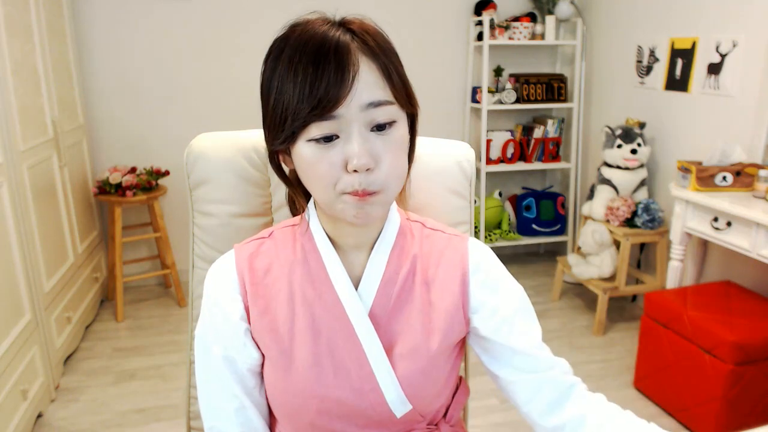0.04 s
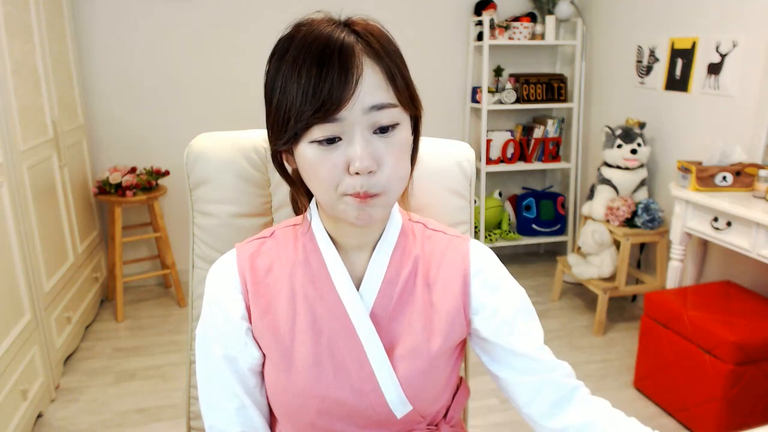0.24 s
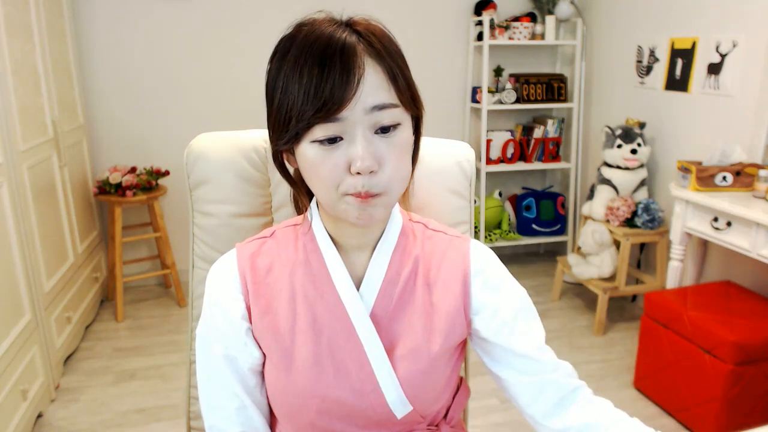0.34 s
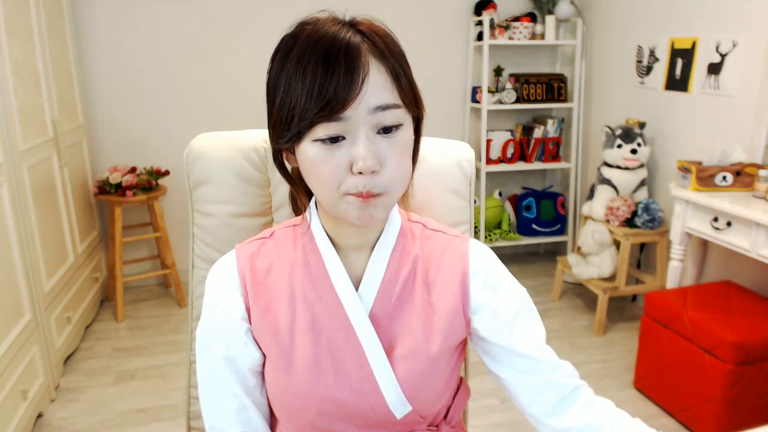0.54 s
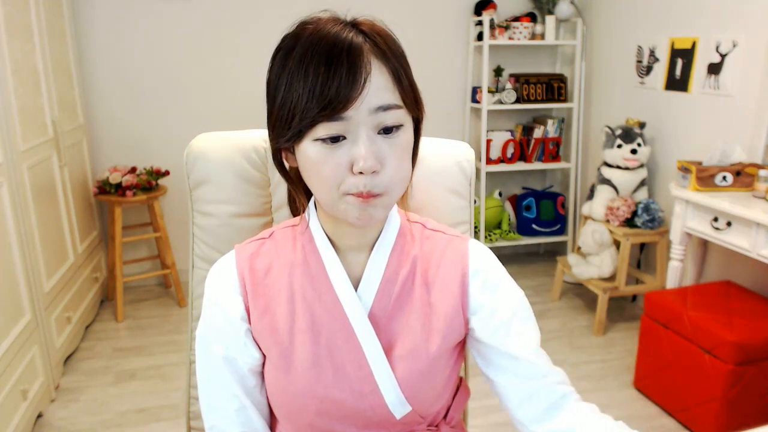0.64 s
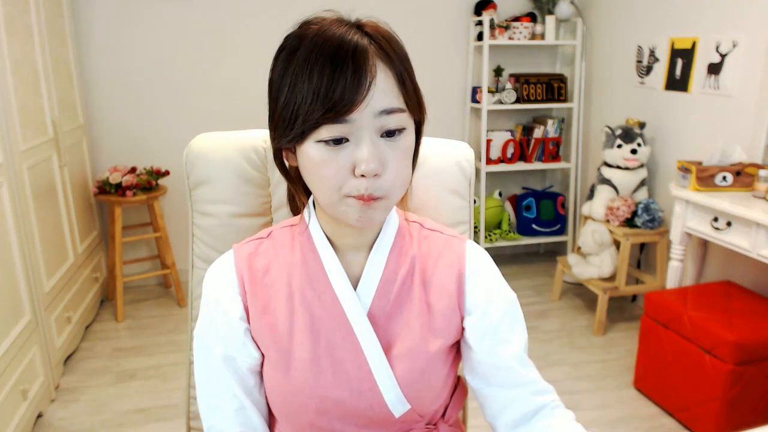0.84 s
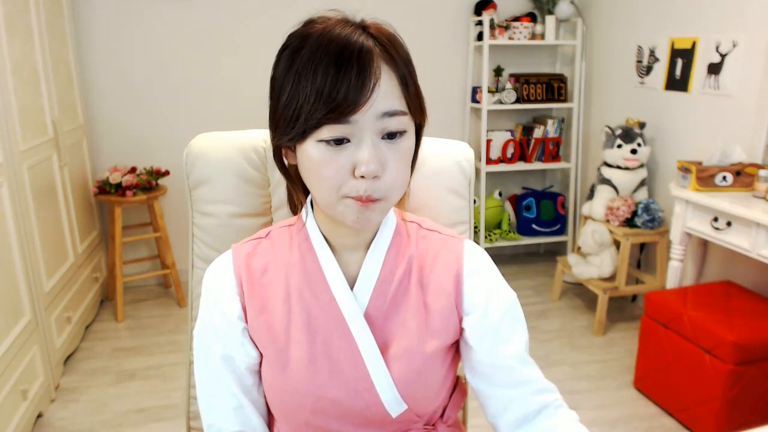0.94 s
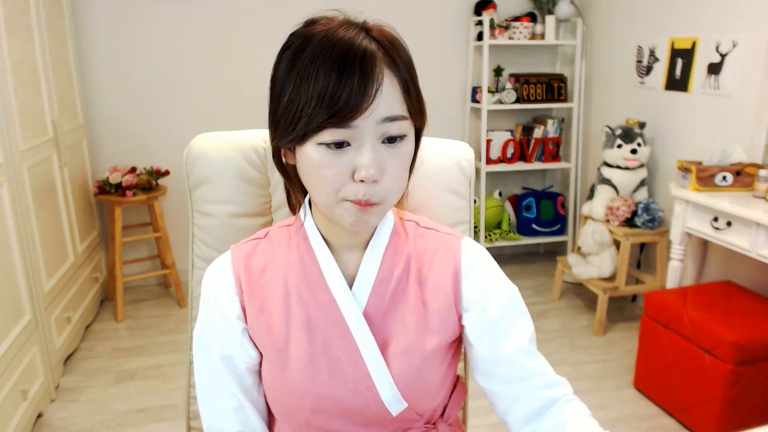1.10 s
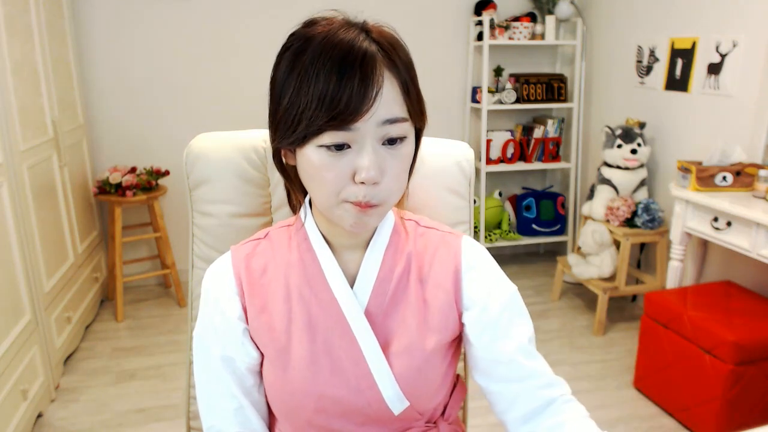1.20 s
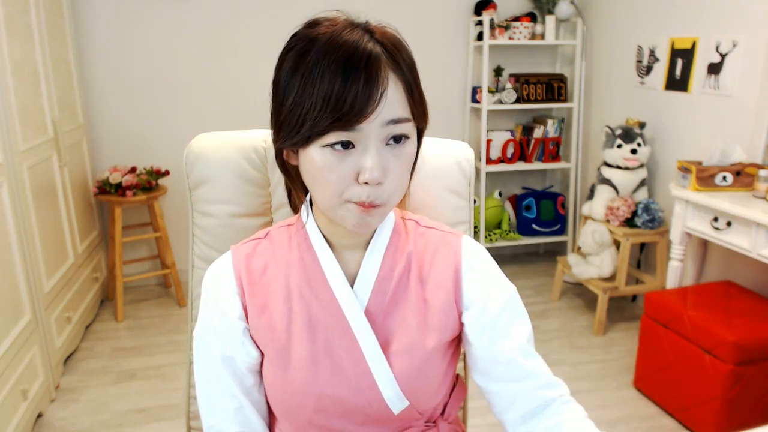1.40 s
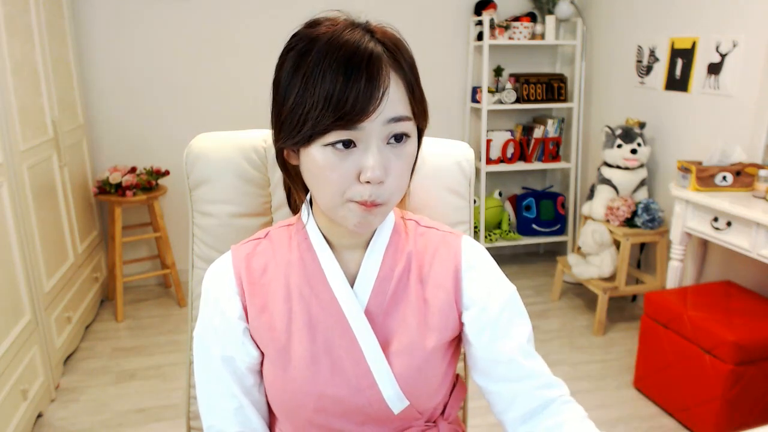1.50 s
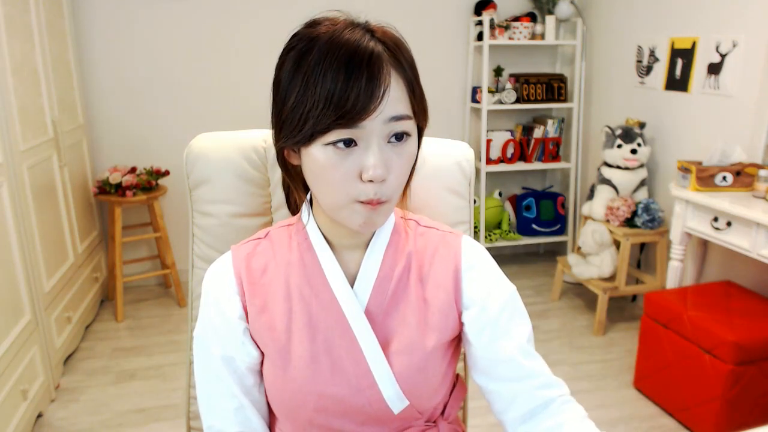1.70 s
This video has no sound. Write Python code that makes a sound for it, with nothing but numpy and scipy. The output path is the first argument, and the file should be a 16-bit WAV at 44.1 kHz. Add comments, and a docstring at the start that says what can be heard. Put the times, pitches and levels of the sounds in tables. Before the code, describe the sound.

A ceramic mug is set on a table in two quick knocks over low room hum.

```python
"""A ventilation hum and a thin hiss are heard first and go on throughout: coloured noise and wavering lines.
Close to the microphone a ceramic mug is then set down on a table in two goes, each a light touch and a
heavier blow: force pulses convolved with a knock, its echoes, modes, dense ringing and a small room.
The mug settles with a soft bump, noise shaped by resonances; two faint brushes of swelling noise follow."""
import sys
import numpy as np
from scipy import signal
from scipy.fft import rfft, irfft
from scipy.io import wavfile

SR = 44100
rng = np.random.default_rng(int(sys.argv[2]) if len(sys.argv) > 2 else 0)


def materialize(psi):
    """Save the field psi as 16-bit PCM at rate SR to the path in sys.argv[1].

    A 1-D psi becomes a single channel; in a 2-D psi each row is a channel.
    """
    bounded = np.clip(np.atleast_2d(psi).T, -1, 1)
    quanta = np.round(bounded * 32767).astype(np.int16)
    wavfile.write(sys.argv[1], SR, quanta)


N = 77175
T = np.arange(N) / SR  # seconds

# Relative colour of the air noise. Each row: frequency in Hz, density in dB per Hz.
AIR_COLOUR = [(20, -2.5), (32, 0), (60, -5), (85, -8), (130, -6), (200, -8), (260, -15), (370, -12.5),
              (500, -20), (750, -21.5), (1200, -27.5), (1850, -26.5), (2400, -33), (3600, -37.5),
              (8000, -40.5), (15500, -41)]
AIR_DB = -47  # rms
# Hum lines. Each row: frequency in Hz, rms level in dB of the steady part.
HUM_LINES = [(49, -45), (100, -61), (145, -50.5), (176.5, -52.5), (351, -65), (564, -74)]
HUM_WAVER, HUM_WAVER_HZ = 0.39, 5.1  # rms share of each line, half width of its spectrum at 1/e

# Contacts of the mug's base. Each row: start in seconds, level in dB, treble corner of the contact
# in Hz, spot on the table (0 or 1).
CONTACTS = [(0.217, -12, 2360, 0), (.2187, 1, 910, 0), (0.451, -15.5, 1480, 1), (0.4557, -6.5, 1370, 1)]
# Relative colour of the dead knock. Each row: frequency in Hz, level in dB.
KNOCK_COLOUR = [(30, -15.5), (120, -9.5), (330, -0.5), (700, -15), (1100, -17.5), (2500, -19.5),
                (4000, -28.5), (9000, -30.5), (16000, -51)]
KNOCK_DB = (15, 9)  # at each spot
# Reflections from nearby surfaces. Each row: delay in seconds, level in dB relative to the knock.
ECHOES = [(.008, -12.5), (.011, -14), (0.0139, -9), (.0286, -13.5), (0.039, -16.5), (0.069, -22)]
# Modes of the table with the mug on it, before the seated mug damps them. Each row: frequency in Hz,
# t60 in seconds, level in dB at the first spot, level in dB at the second spot.
TABLE_MODES = [(48, .3, -37, -15), (61.4, 0.31, -19, -12), (143, .2, -19, -43), (158.1, 0.35, -30, -15.5),
               (273.2, 0.28, -21, -29), (351.7, 0.41, -21, -15), (408.6, 0.15, -19, -18),
               (470.6, 0.29, -30, -28), (586, 0.25, -54, -19.5), (620, .23, -18.5, -39),
               (708, 0.21, -18.5, -46), (884, .17, -31, -24), (1019.4, .2, -26.5, -46),
               (1290, .2, -39, -44)]
# The mug's own short rings, before the same damping. Each row: frequency in Hz, t60 in seconds,
# level in dB at the first spot, level in dB at the second spot.
MUG_MODES = [(1490, 0.23, -45, -31), (2220, .15, -43, -22), (2340, 0.26, -47, -33.5),
             (2520, 0.173, -46, -39), (3970, .12, -54, -43), (4700, .1, -48, -30)]
# Relative colour of the dense ringing. Each row: frequency in Hz, dB at the first spot, dB at the second.
RING_COLOUR = [(30, -13, 4), (120, -7, -13), (352, -3, -1), (690, -3, -1.5), (800, -9.5, -23),
               (1100, -7.5, -12), (2350, -15, -11.5), (2610, -13, -29), (3600, -24, -18.5),
               (4970, -19, -19), (9000, -21.5, -36), (16000, -28, -42)]
RING_DB, RING_T60_S, RING_RISE_S = 14, 0.073, 0.00099
# Relative colour of the room's answer. Each row: frequency in Hz, level in dB.
ROOM_COLOUR = [(30, 1), (150, 4.5), (400, -1), (700, 0), (1200, -5.5), (2450, -7), (3000, -14), (6000, -17),
               (16000, -24)]
# Decay of the room. Each row: frequency in Hz, t60 in seconds.
ROOM_DECAY = [(60, .4), (400, .32), (1100, 0.31), (2900, 0.25), (8000, 0.25)]
ROOM_DB, ROOM_RISE_S = (10.5, 10.5), 0.016  # level at each spot

# Resonances stirred as the base settles. Each row: centre in Hz, full width at half amplitude in Hz,
# rms level in dB relative to the others.
SETTLE_RESONANCES = [(150, 67, -5), (250, 39, -1), (430, 90, -10.5), (588, 43, -7), (680, 39, -7.5),
                     (925, 200, -18), (1740, 260, -23)]
SETTLE_S, SETTLE_RISE_S, SETTLE_T60_S, SETTLE_DB = 0.583, 0.011, 0.24, -31
SEATED_T60_S = 0.28  # extra damping of the table once the mug sits flat

# Faint brushes. Each row: time of the peak in seconds, half length at 1/e in seconds, peak rms level in dB.
BRUSHES = [(0.995, 0.046, -61), (1.181, 0.025, -55)]
# Relative colour of the brushes. Each row: frequency in Hz, level in dB.
BRUSH_COLOUR = [(100, -6), (370, -1), (700, -22), (2000, -15), (5000, -21), (9000, -26.5), (16000, -39)]

LOW_CUT_HZ, TOP_HZ = 21.3, 15800
CEILING = 1.0  # full scale


def undb(db):
    """Convert decibels to an amplitude ratio, by the definition of level."""
    return 10 ** (np.asarray(db) / 20)


def curve(points, hz):
    """Interpolate a table linearly on a logarithmic frequency axis."""
    table_hz, values = np.array(points, float).T
    return np.interp(np.log(np.maximum(hz, 1)), np.log(table_hz), values)


def colour(x, points):
    """Spectral shaping: weight a spectrum by a dB curve, keeping the power of white noise."""
    gain = undb(curve(points, np.fft.rfftfreq(N, 1 / SR)))
    return irfft(rfft(x) * gain / np.sqrt(np.mean(gain ** 2)), N)


def ventilation():
    """Broadband flow noise superposed on tones whose random modulation wavers in level and phase."""
    out = undb(AIR_DB) * colour(rng.standard_normal(N), AIR_COLOUR)
    waver_band = np.exp(-(np.fft.fftfreq(N, 1 / SR) / HUM_WAVER_HZ) ** 2)
    for hz, db in HUM_LINES:
        waver = np.fft.ifft(waver_band * np.exp(2j * np.pi * rng.random(N)))
        carrier = np.exp(2j * np.pi * (hz * T + rng.random()))
        line = (1 + HUM_WAVER * waver / waver.std()) * carrier
        out = out + np.sqrt(2) * undb(db) * line.real
    return out


def click(points):
    """Minimum phase: the most compact causal pulse of a given colour, here of unit energy."""
    cepstrum = irfft(np.log(undb(curve(points, np.fft.rfftfreq(N, 1 / SR)))), N)
    # folding the cepstrum onto positive times makes the pulse causal
    cepstrum[1:N // 2] *= 2
    cepstrum[N // 2:] = 0
    pulse = irfft(np.exp(rfft(cepstrum)), N)
    return pulse / np.linalg.norm(pulse)


def convolve(a, b):
    """Linear superposition: pass one sound through a response."""
    return signal.fftconvolve(a, b)[:N]


def fade(t60):
    """Exponential decay: the level falls by 60 dB in t60 seconds."""
    return np.exp(-np.log(1000) * T / t60)


def diffuse(decays, rise, count=12):
    """Diffuse field: a dense random tail, even in colour, each band with its own decay."""
    hz = np.fft.rfftfreq(N, 1 / SR)
    edges = np.r_[0, np.geomspace(120, 12000, count), SR]
    noise = rfft(rng.standard_normal(N))
    onset = 1 - np.exp(-T / rise)
    out = 0
    for low, high in zip(edges[:-1], edges[1:]):
        inside = (hz >= low) & (hz < high)
        band = irfft(noise * inside, N) * fade(decays((low + high) / 2)) * onset
        # energy in proportion to bandwidth
        out = out + band * np.sqrt(inside.mean()) / np.linalg.norm(band)
    return out


def push(at, db, corner_hz):
    """Contact force: a smooth pulse, longer and duller when the contact is soft."""
    age = np.maximum(T - at, 0) * 2 * np.pi * corner_hz
    force = age * np.exp(-age)
    return undb(db) * force / force.sum()


def table(spot):
    """Impulse response at one spot: knock, reflections, modes, dense ringing and room superposed."""
    knock = undb(KNOCK_DB[spot]) * click(KNOCK_COLOUR)
    echoes = sum(undb(db) * np.interp(T - delay, T, knock, left=0) for delay, db in ECHOES)
    modes = 0
    for hz, t60, *db in [*TABLE_MODES, *MUG_MODES]:
        modes = modes + undb(db[spot]) * fade(t60) * np.sin(2 * np.pi * hz * T)
    ring_colour = [(hz, db[spot]) for hz, *db in RING_COLOUR]
    ring = convolve(diffuse(lambda hz: RING_T60_S, RING_RISE_S), click(ring_colour))
    room = convolve(diffuse(lambda hz: curve(ROOM_DECAY, hz), ROOM_RISE_S), click(ROOM_COLOUR))
    return knock + echoes + modes + undb(RING_DB) * ring + undb(ROOM_DB[spot]) * room


def mug():
    """Forced response and damping: each contact pushes the table down; the seated mug damps the ringing."""
    ringing = 0
    for at, db, corner_hz, spot in CONTACTS:
        # the minus sign is the downward push
        ringing = ringing - convolve(push(at, db, corner_hz), table(round(spot)))
    return ringing * undb(-60 * np.maximum(T - SETTLE_S, 0) / SEATED_T60_S)


def settle():
    """Resonance excited by friction: a short soft scuff of the base, heard as bands of noise."""
    hz = np.fft.rfftfreq(N, 1 / SR)
    age = np.maximum(T - SETTLE_S, 0)
    out = 0
    for centre, width, db in SETTLE_RESONANCES:
        random_phase = np.exp(2j * np.pi * rng.random(len(hz)))
        band = irfft(random_phase / (1 + (2 * (hz - centre) / width) ** 2), N)
        out = out + undb(db) * band / band.std()
    decay = undb(SETTLE_DB - 60 * age / SETTLE_T60_S)
    return decay * (1 - np.exp(-age / SETTLE_RISE_S)) * out


def brush():
    """Rubbing as amplitude-modulated noise: faint, short swells with a Gaussian envelope."""
    swell = sum(undb(db) * np.exp(-((T - at) / half) ** 2) for at, half, db in BRUSHES)
    return swell * colour(rng.standard_normal(N), BRUSH_COLOUR)


def scene():
    """Superposition of ventilation, mug, settling and brushes at one microphone."""
    return (ventilation() + mug() + settle() + brush())[None]


def record(dry):
    """Band limiting and clipping: cut the deepest rumble, hold peaks to the ceiling, cut the top."""
    low_cut = signal.butter(1, LOW_CUT_HZ, "high", fs=SR, output="sos")
    top_cut = signal.ellip(10, .1, 80, TOP_HZ, fs=SR, output="sos")
    clipped = np.clip(signal.sosfilt(low_cut, dry), -CEILING, CEILING)
    return signal.sosfilt(top_cut, clipped)


dry = scene()
out = record(dry)
materialize(out)
```